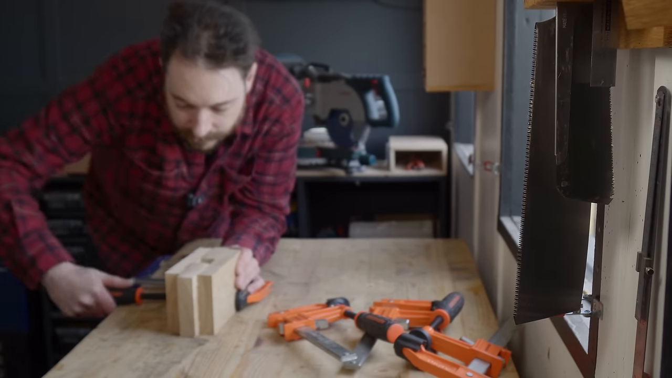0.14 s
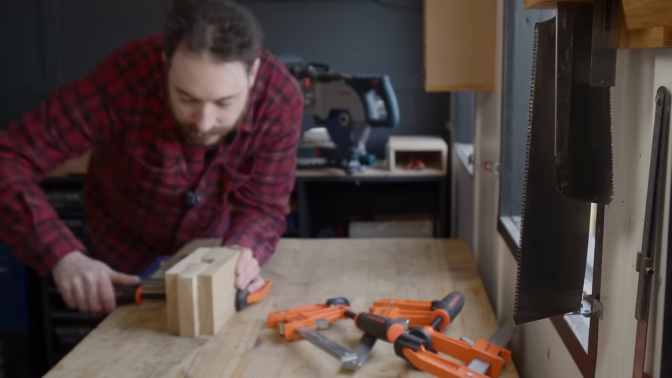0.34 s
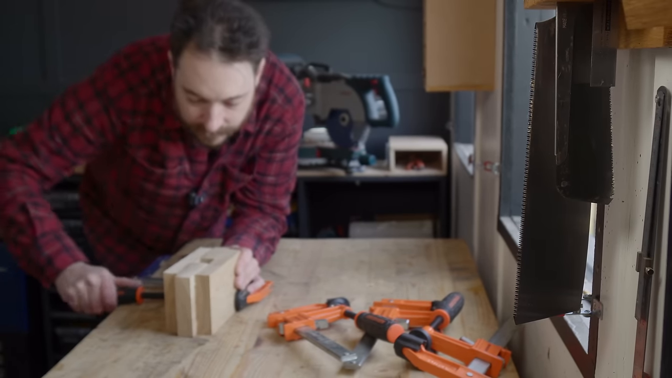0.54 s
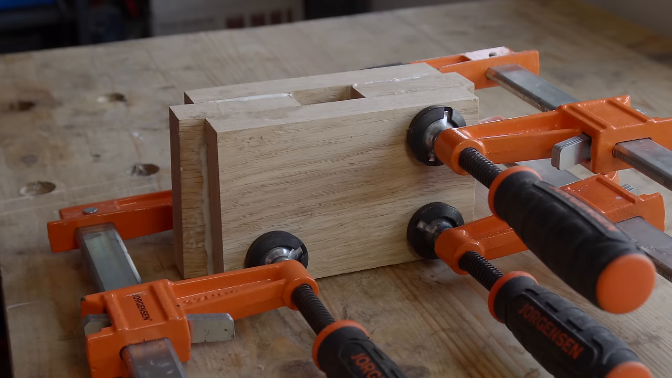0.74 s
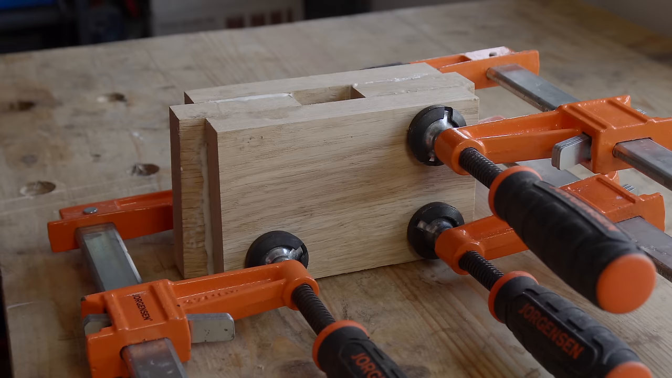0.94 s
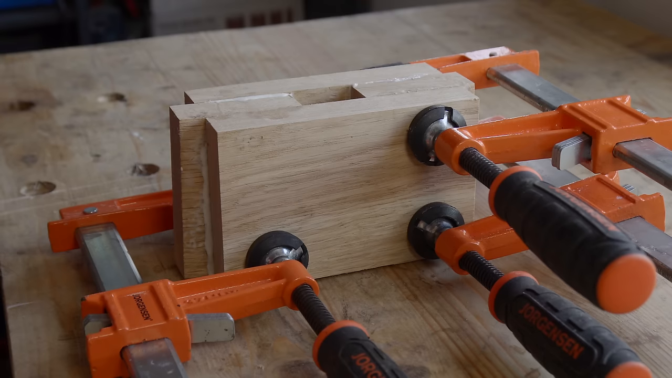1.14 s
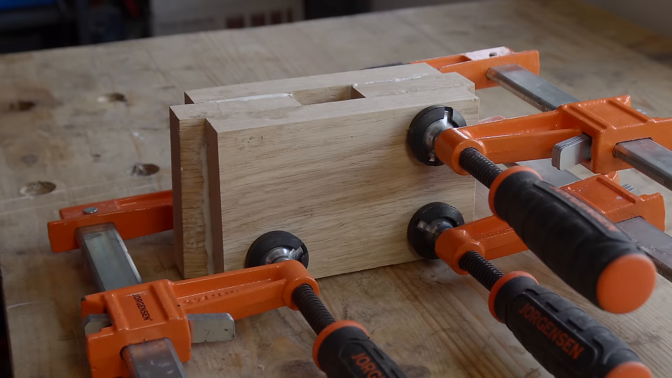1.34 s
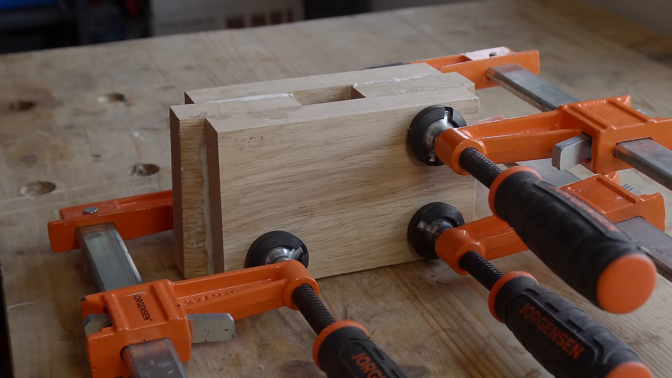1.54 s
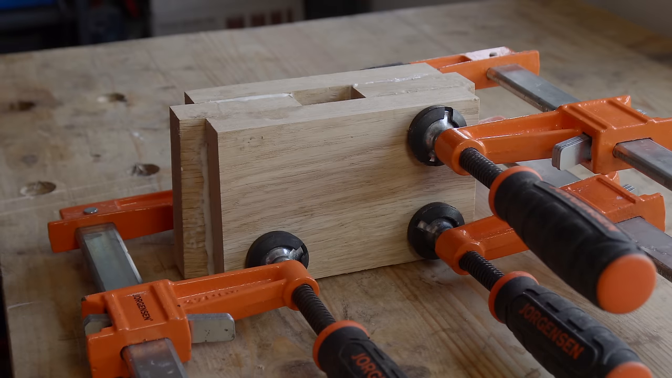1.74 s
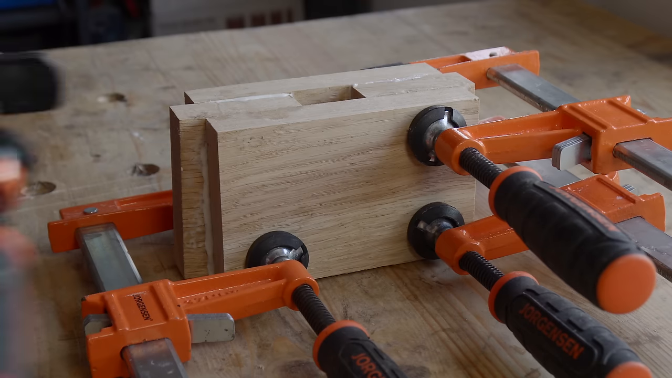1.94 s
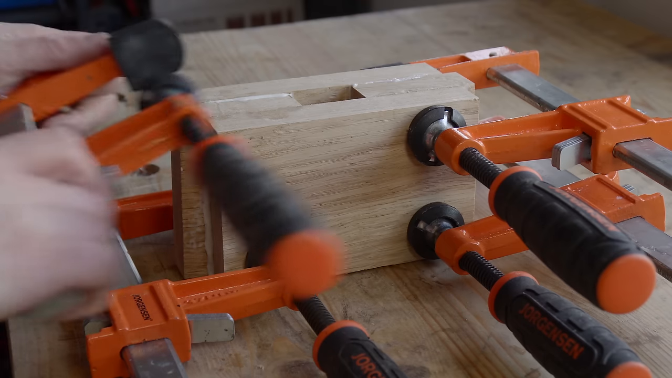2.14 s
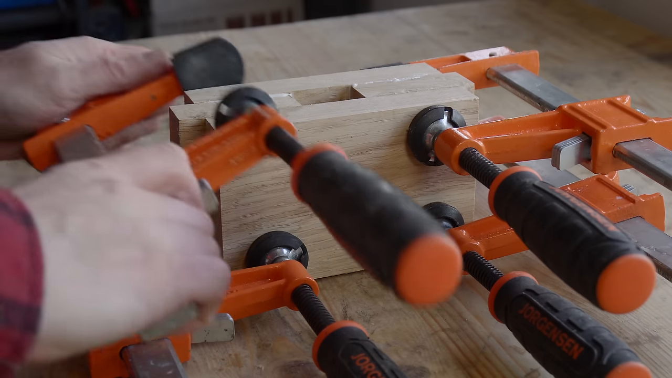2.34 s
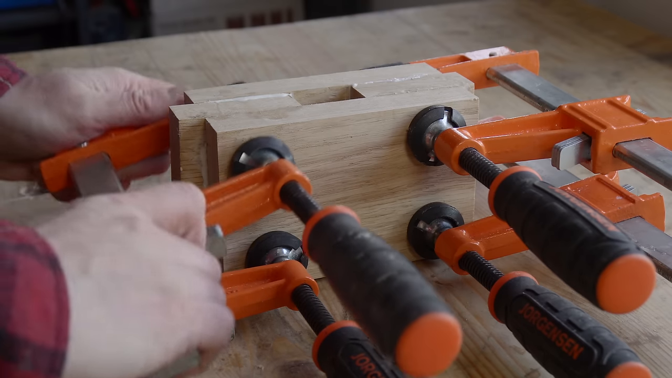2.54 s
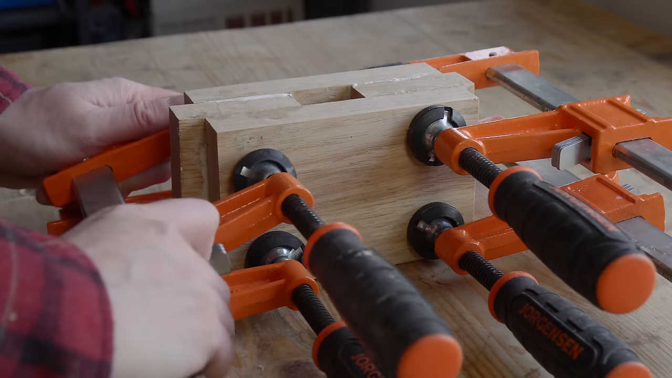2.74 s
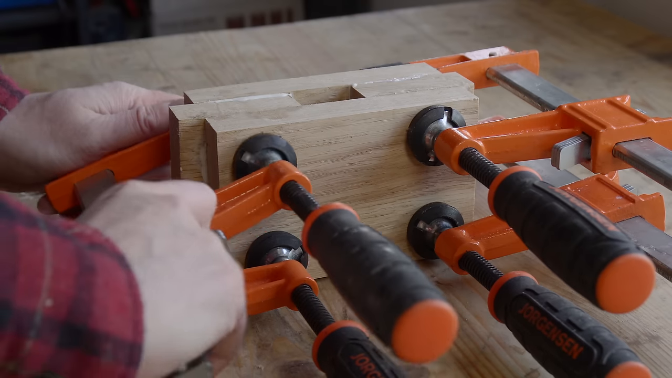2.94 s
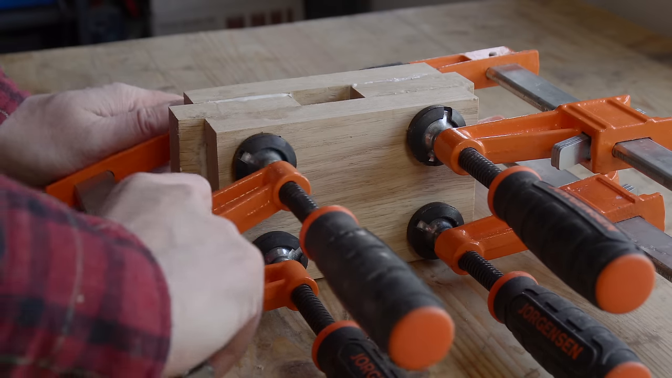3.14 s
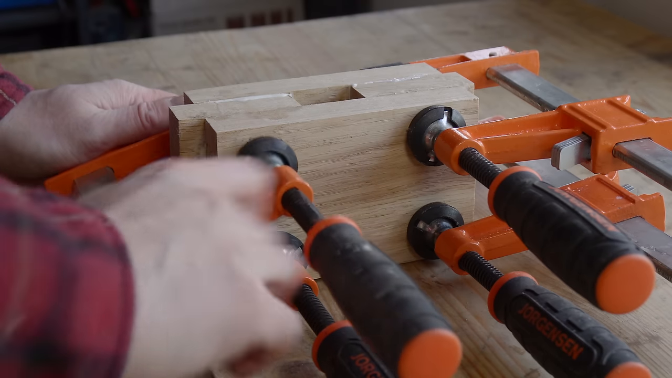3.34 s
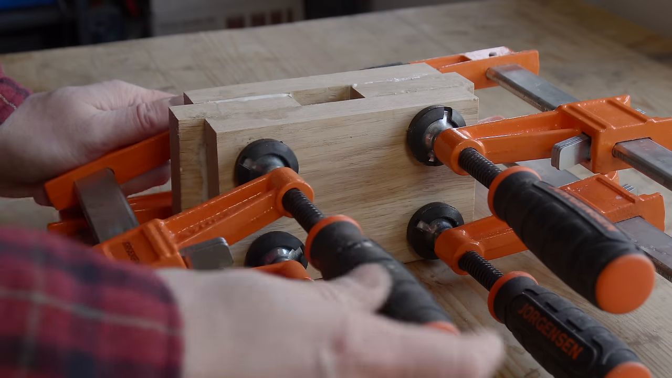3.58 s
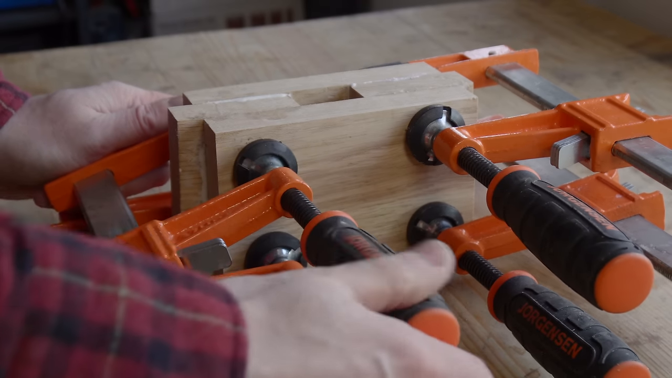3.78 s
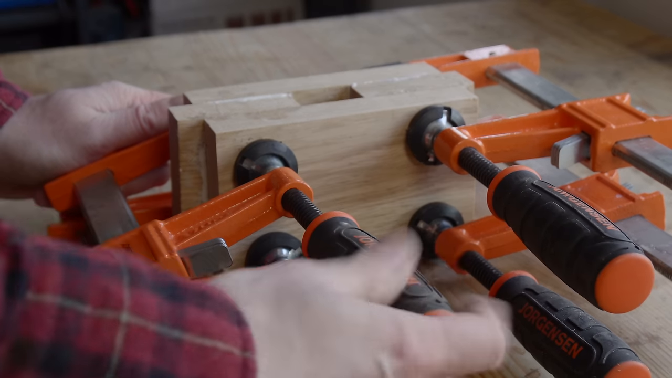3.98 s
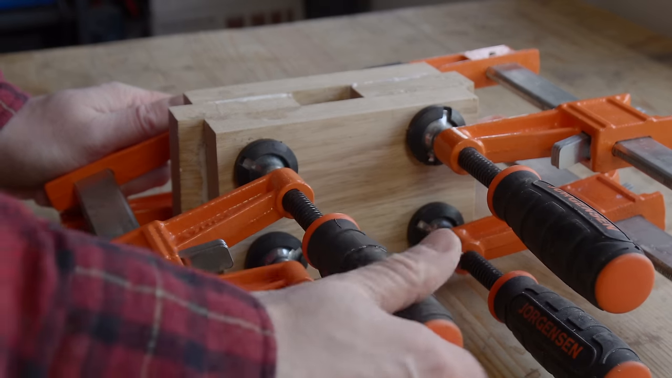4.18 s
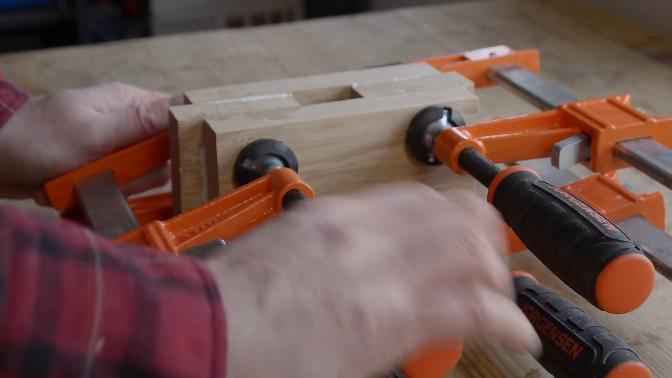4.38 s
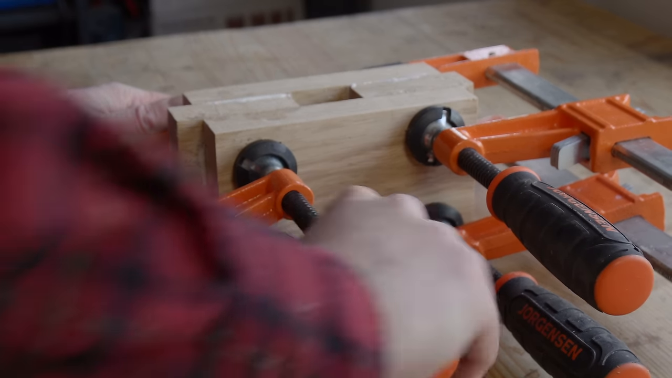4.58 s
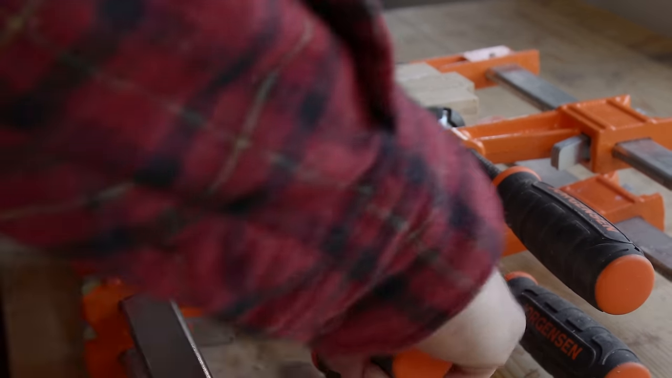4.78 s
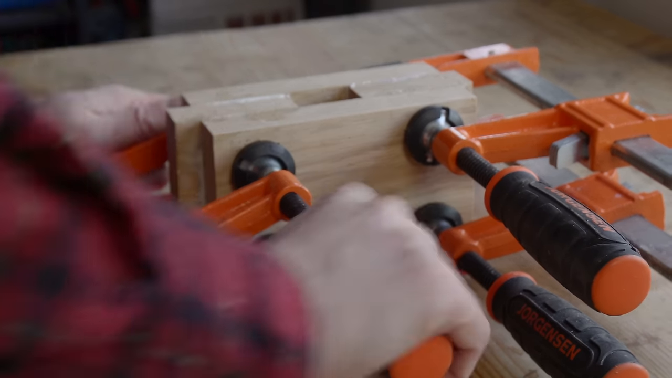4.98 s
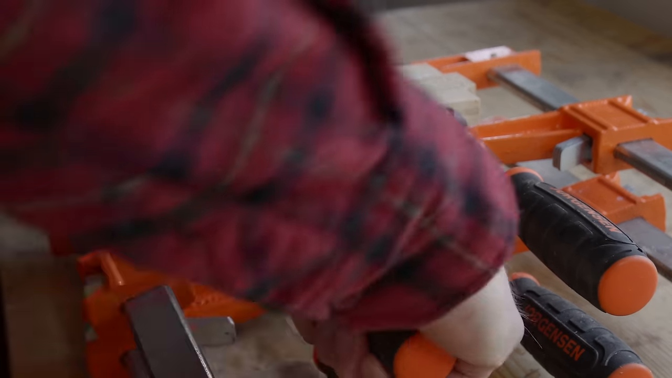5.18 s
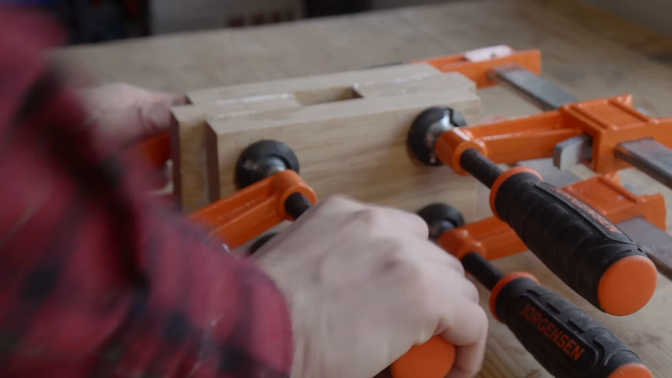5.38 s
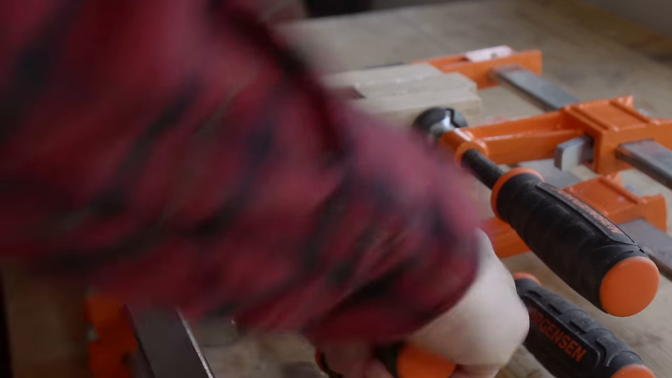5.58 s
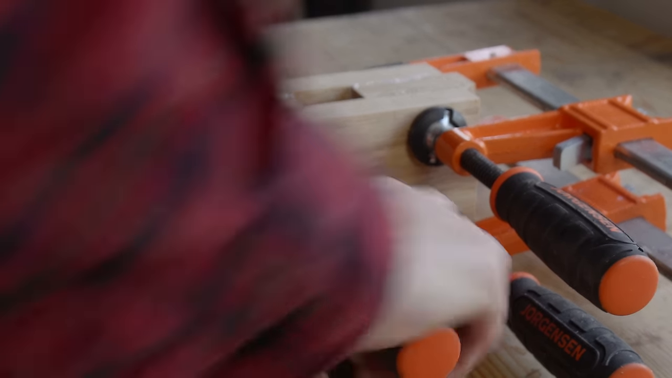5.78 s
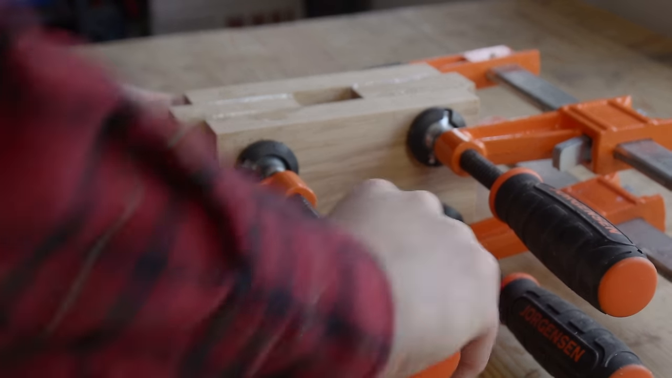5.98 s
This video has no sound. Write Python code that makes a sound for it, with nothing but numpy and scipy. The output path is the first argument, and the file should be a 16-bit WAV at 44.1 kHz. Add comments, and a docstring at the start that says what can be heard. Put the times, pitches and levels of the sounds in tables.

```python
"""A wooden block rubs dully on a workbench, which sways on its legs, under a faint whistling tone.
One microphone above the bench in a small workshop, a shirt sleeve rustling close by. Steel bar clamps
are being fitted: a jaw rasps and chatters along its ringing bar, the clamp knocks down on the wood and
is shut, and its swivel pad slaps the block. The screw ticks, and each of three turns of the handle
bumps the bench and sets it rocking again."""
import sys
import numpy as np
from scipy import signal
from scipy.fft import rfft, irfft
from scipy.io import wavfile

SR = 44100
rng = np.random.default_rng(int(sys.argv[2]) if len(sys.argv) > 2 else 0)


def bounce(signal):
    """Save signal as a 16-bit WAV file at the path given by the first command-line argument."""
    frames = np.transpose(np.atleast_2d(signal))
    limited = np.clip(frames, -1, 1)
    pcm = np.round(limited * 32767).astype(np.int16)
    wavfile.write(sys.argv[1], SR, pcm)


N = 265614
TIME = np.arange(N) / SR


def from_db(db):
    """Decibels to gain."""
    return 10 ** (np.asarray(db) / 20)


def rms_one(x):
    """Scale to rms 1."""
    return x / np.sqrt(np.mean(x ** 2) + 1e-20)


def unit_energy(x):
    """Scale so that the squares sum to 1."""
    return x / np.linalg.norm(x)


def at_hz(points, hz):
    """Read a table on a log-frequency axis."""
    freqs, values = np.transpose(points)
    return np.interp(np.log(np.maximum(hz, 1)), np.log(freqs), values)


def add(track, start_s, sound):
    """Mix a sound into a track."""
    start = round(start_s * SR)
    track[start:start + len(sound)] += sound[:N - start]


def convolve(x, response):
    """Pass a signal through an impulse response."""
    return signal.oaconvolve(x, response)[:N]


def lowpass(x, hz, order=2):
    """Butterworth low-pass."""
    return signal.sosfilt(signal.butter(order, min(hz, .45 * SR), fs=SR, output="sos"), x)


def bandpass(x, edges_hz):
    """Butterworth band-pass."""
    return signal.sosfilt(signal.butter(2, edges_hz, "band", fs=SR, output="sos"), x)


def coloured(x, colour, size=4096):
    """Causal (minimum-phase) filter with the given spectral shape and unit energy."""
    gain = from_db(at_hz(colour, np.fft.rfftfreq(size, 1 / SR)))
    cepstrum = irfft(np.log(gain))
    cepstrum[1:size // 2] *= 2
    cepstrum[size // 2 + 1:] = 0
    response = irfft(np.exp(rfft(cepstrum)))
    return convolve(x, unit_energy(response))


def noise(colour):
    """Coloured noise, rms 1."""
    return rms_one(coloured(rng.standard_normal(N), colour))


def wander(rate_hz):
    """Smooth random drift, rms 1."""
    return rms_one(lowpass(rng.standard_normal(N), rate_hz))


def flutter(rate_hz, depth_db):
    """Uneven contact: a gain that wanders at random, rms 1."""
    return rms_one(from_db(depth_db * np.clip(wander(rate_hz), -2, 2)))


def grains(per_s, spread_db):
    """Tiny random impulses of uneven size, rms 1."""
    sizes = from_db(spread_db * np.minimum(rng.exponential(1, N), 4))
    signs = rng.choice([-1, 1], N)
    present = rng.random(N) < per_s / SR
    return rms_one(sizes * signs * present)


def ringing(modes, size=22050):
    """Impulse response of damped modes, given as rows of pitch_hz, level_db, t60_s."""
    t = TIME[:size]
    return sum(from_db(db - 60 * t / t60) * np.cos(2 * np.pi * hz * t) for hz, db, t60 in modes)


def burst(decay_s, size=2048):
    """Micro-bounces of one contact: roughly even in spectrum, dying quickly, unit energy."""
    t = TIME[:size]
    bounces = rng.standard_normal(size) * np.exp(-t / decay_s)
    whitened = irfft(np.exp(1j * np.angle(rfft(bounces))))
    return unit_energy(whitened * np.exp(-t / (4 * decay_s)))


def swell(peak_s, db, half_s):
    """Bell-shaped rise and fall in level."""
    return from_db(db) * np.exp(-np.minimum(((TIME - peak_s) / half_s) ** 2, 20))


def stroke(peak_s, db, attack_s, hold_s, release_s):
    """Level of one push: it grows tenfold per attack time, holds, and falls tenfold per release time."""
    early = np.maximum(peak_s - TIME, 0) / attack_s
    late = np.maximum(TIME - peak_s - hold_s, 0) / release_s
    return from_db(db - 20 * np.minimum(early + late, 10))


# Tightening turns, timed where the hand grips the handle and bumps the bench: start_s, bump_db
TURNS = [(5.0903, -23), (5.5348, -23), (6.0009, -23.5)]

def each_turn(after_s, db, half_s):
    """One part of the gesture, repeated on every turn: rows of peak_s, level_db, half_length_s."""
    return [(start_s + after_s, db, half_s) for start_s, _ in TURNS]


# Spectrum of the quiet workshop: freq_hz, gain_db
ROOM_TONE_COLOUR = [(25, 11.5), (100, -0.5), (300, -1.5), (800, 0), (1500, -8), (3000, -10.5), (6000, -16),
                    (15000, -22)]

def room_tone(level_db=-72):
    """A faint, steady, low background at the microphone."""
    return from_db(level_db) * noise(ROOM_TONE_COLOUR)


# Hands shift the block on the bench: peak_s, level_db, half_length_s
RUBS = [(0.08, -63, 0.19), (0.523, -56.5, 0.048), (2.586, -70, 0.041), (3.781, -66.5, 0.18),
        (4.386, -68.5, 0.13), (4.95, -65.5, 0.31)]
# Spectrum of wood dragged on wood: freq_hz, gain_db
RUB_COLOUR = [(60, -13), (130, -12), (200, 6.5), (320, 0), (600, -5.5), (1000, -16), (2000, -20.5),
              (5000, -36)]

def block_rub():
    """The block drags over the bench in sparse, dull slips when shifted and on each turn."""
    moves = RUBS + each_turn(after_s=0.19, db=-61.5, half_s=0.22)
    level = sum(swell(*move) for move in moves)
    return level * coloured(grains(per_s=410, spread_db=-1.5), RUB_COLOUR)


# Shoves that set the bench swaying: start_s, level_db
SHOVES = [(0.1, -72.5), (0.626, -60), (1.029, -78), (2.625, -56), (3.005, -47.5), (3.411, -55),
          (4.1, -52.5), (4.6, -47)]
# Spectrum of the bench's rumble: freq_hz, gain_db
RUMBLE_COLOUR = [(12, -10), (25, 0), (50, -2.5), (90, -10.5), (160, -29.5), (500, -66)]

def bench_sway(leg_hz=26.6, wander_hz=3, rumble_db=-5, turn_db=-47, lag_s=0.085):
    """After each shove or turn the bench rocks at the wavering rate of its legs, rumbles and settles."""
    shoves = SHOVES + [(s, turn_db) for s, _ in TURNS]
    level = sum(stroke(s + lag_s, db, attack_s=0.11, hold_s=0.026, release_s=0.38) for s, db in shoves)
    rate_hz = leg_hz + wander_hz * wander(rate_hz=10)
    rocking = rms_one(np.sin(2 * np.pi * np.cumsum(rate_hz) / SR))
    return level * (rocking + from_db(rumble_db) * noise(RUMBLE_COLOUR))


# Two faint, drawn-out whistling tones, then two short creaks: peak_s, level_db, half_length_s, pitch_hz
WHISTLES_AND_CREAKS = [(0.23, -76, 0.16, 1500), (3.776, -72, 0.2, 1780), (4.387, -63.5, 0.026, 1150),
                       (5.68, -56, 0.043, 620)]

def whistles_and_creaks(twist_hz=1174, log_half_width=0.14):
    """Narrow bands of noise whistle or creak; on each turn the pad creaks as it twists on the wood."""
    twists = [(*twist, twist_hz) for twist in each_turn(after_s=0.229, db=-62, half_s=0.031)]
    hiss = grains(per_s=4100, spread_db=0.5)
    tones = np.zeros(N)
    for peak_s, db, half_s, pitch_hz in WHISTLES_AND_CREAKS + twists:
        resonance = bandpass(hiss, pitch_hz * np.exp([-log_half_width, log_half_width]))
        tones += swell(peak_s, db, half_s) * rms_one(resonance)
    return tones


# Blows that reach the block and bench: start_s, level_db, hardness_hz
KNOCKS = [(0.471, -55.5, 2960), (0.626, -48, 2920), (2.524, -47.5, 1400), (2.625, -39, 291),
          (2.8511, -48.5, 1484), (2.927, -40.5, 792), (2.976, -32.5, 1210), (3.005, -25.5, 920),
          (3.064, -35, 850), (3.412, -31, 1800), (4.069, -41.5, 297), (4.356, -39, 700), (4.374, -40, 1277),
          (4.521, -44, 447)]
# Modes of the block and bench top: pitch_hz, level_db, t60_s
BENCH_MODES = [(176, -6, .28), (200, -5, .24), (275, -4, .19), (324, -8, .17), (376, -2, .12),
               (484, -11, .13), (535, -7, .15), (665, -7, .1), (900, -8, .08)]
# Spectrum of the wood's thud: freq_hz, gain_db
THUD_COLOUR = [(60, -16), (150, -9.5), (300, 6.5), (600, -5.5), (1200, -2.5), (3000, -12.5), (9000, -31)]

def bench_knocks(thud_db=14, ring_db=-11, vary_db=3, turn_hardness_hz=615):
    """Each blow thuds and rings the bench in its own mix; soft contacts reach only the low modes."""
    push, ring = np.zeros(N), np.zeros(N)
    impulse = signal.unit_impulse(SR // 20)
    bumps = [(*turn, turn_hardness_hz) for turn in TURNS]
    for start_s, db, hardness_hz in KNOCKS + bumps:
        modes = [(hz, level + vary_db * rng.standard_normal(), t60) for hz, level, t60 in BENCH_MODES]
        add(push, start_s, from_db(db) * lowpass(impulse, hardness_hz, order=4))
        add(ring, start_s, from_db(db) * lowpass(ringing(modes), hardness_hz, order=4))
    return from_db(thud_db) * coloured(push, THUD_COLOUR) + from_db(ring_db) * ring


# The arm moves between jobs, close to the microphone: peak_s, level_db, half_length_s
SWISHES = [(0.778, -70, 0.082), (2.207, -76, 0.091), (3.351, -73, 0.054), (3.75, -71.5, 0.11),
           (4.1, -71, 0.082), (4.272, -69, 0.05), (4.376, -61, 0.028), (4.59, -63.5, 0.099)]
# Spectrum of shirt cloth: freq_hz, gain_db
SLEEVE_COLOUR = [(500, -7.5), (1300, -1.5), (2200, -5), (3000, 3), (4200, -4), (7000, -1.5), (10000, -7.5),
                 (15000, -10)]

def sleeve_rustle():
    """Cloth fibres hiss unevenly as the arm moves, swings back for a turn and grips the handle."""
    reaches = each_turn(after_s=-0.17, db=-62.5, half_s=0.04)
    grips = each_turn(after_s=-0.013, db=-60, half_s=0.034)
    level = sum(swell(*move) for move in SWISHES + reaches + grips)
    fibres = coloured(grains(per_s=6300, spread_db=1.0), SLEEVE_COLOUR)
    return level * fibres * flutter(rate_hz=55, depth_db=2.4)


# Single steel-on-steel contacts: start_s, level_db, brightness_hz
CLINKS = [(0.995, -40, 6830), (1.029, -21.5, 12100), (1.0318, -12, 15500), (1.292, -17.5, 8100),
          (1.5, -37, 4320), (1.672, -45, 3900), (1.704, -42.5, 7640), (1.7486, -36.5, 13600),
          (1.798, -26.5, 4400), (1.8333, -26.5, 4660), (1.836, -34.5, 4900), (2.627, -47, 6700),
          (2.8513, -25.5, 8330), (2.854, -32, 8740), (2.917, -36, 4250), (2.937, -39, 6000),
          (2.9526, -23, 13000), (2.9965, -26, 14500), (3.0056, -18.5, 16450), (3.0069, -16, 14300)]
# Modes of the clamp's bar and jaw: pitch_hz, level_db, t60_s
BAR_MODES = [(1720, -11, .12), (2169, -7, .26), (2406, -9, .14), (2467, -10, .18), (3402, -8, .11),
             (4274, -5, .21), (4404, -7, .18), (4618, -4, .19), (6053, -6, .19), (7009, -6, .13),
             (7594, -6, .21), (7682, -6, .21), (7951, -7, .24), (8630, -12, .16), (9453, -3, .2),
             (11397, 5.5, .14), (11487, 6.5, .13), (12586, -4, .16)]
# Spectrum of the crack of steel on steel: freq_hz, gain_db
CRACK_COLOUR = [(150, -31), (600, -20), (1200, -9.5), (1700, -4.5), (2400, -0.5), (3300, -4), (4500, 2),
                (7000, 0.5), (10000, -1), (11700, 7), (13200, -5.5), (16000, -15)]

def steel_clinks(crack_db=15, ring_db=-30, vary_db=2.5, single_chatter_s=0.0033):
    """Each contact or catch of the jaw cracks, then the bar rings in a mix set by where it is touched."""
    force, ring = np.zeros(N), np.zeros(N)
    modes = np.array([ringing([mode], size=12000) for mode in BAR_MODES])
    singles = [(*clink, single_chatter_s) for clink in CLINKS]
    for start_s, db, brightness_hz, chatter_s in singles + jaw_catches():
        contact = from_db(db) * lowpass(burst(chatter_s), brightness_hz)
        mix = from_db(vary_db * rng.standard_normal(len(modes)))
        add(force, start_s, contact)
        add(ring, start_s, signal.fftconvolve(contact, mix @ modes))
    return from_db(crack_db) * coloured(force, CRACK_COLOUR) + from_db(ring_db) * ring


# Pushes that slide the jaw: peak_s, level_db, attack_s, hold_s, release_s, top_speed_fraction
SLIDES = [(1.029, -36.5, 0.001, 0.012, 0.091, 1), (1.29, -32, 0.14, 0.028, 0.068, 1),
          (1.501, -49.5, 0.0085, 0.06, 0.06, 0.01), (1.696, -57, 0.019, 0.0073, 0.05, 0.05)]
# Bar modes that sing under the sliding jaw: pitch_hz, width_hz, level_db
SQUEAL_MODES = [(12100, 500, -8), (7600, 50, 0), (7700, 80, 0), (7800, 70, -3), (7952, 45, -1),
                (9455, 40, -5)]
# Spectrum of the jaw's rasp: freq_hz, gain_db
RASP_COLOUR = [(100, -34.5), (400, -13), (900, -2.5), (1700, -5.5), (2400, 1), (5000, 0), (7000, -1.5),
               (10500, -8.5), (12200, -2.5), (13500, -14.5), (16000, -24)]

def jaw_slide(speed_up_s=0.047, slow_cutoff_hz=3800, squeal_db=-2, bar_db=-14):
    """The jaw rasps over the bar and rings it; speed brightens the rasp and makes the bar sing."""
    fast, slow = np.zeros(N), np.zeros(N)
    for peak_s, db, attack_s, hold_s, release_s, top_speed in SLIDES:
        force = stroke(peak_s, db, attack_s, hold_s, release_s)
        speed = top_speed * np.clip(1 + (TIME - peak_s) / speed_up_s, 0, 1)
        fast += force * speed
        slow += force * (1 - speed)
    friction = grains(per_s=9000, spread_db=3.0) * flutter(rate_hz=130, depth_db=1.8)
    drag = fast * friction + lowpass(slow * friction, slow_cutoff_hz, order=1)
    # The narrower a mode, the longer it rings.
    singing = [(hz, db + 10 * np.log10(width_hz), np.log(1000) / (np.pi * width_hz))
               for hz, width_hz, db in SQUEAL_MODES]
    squeal = convolve(fast * friction, unit_energy(ringing(singing)))
    ring = convolve(drag, unit_energy(lowpass(ringing(BAR_MODES), hz=5454)))
    return coloured(drag, RASP_COLOUR) + from_db(bar_db) * ring + from_db(squeal_db) * squeal


# Runs of the juddering jaw: start_s, end_s, gap_s, first_level_db, first_brightness_hz, chatter_s
JUDDERS = [(1.0448, 1.1247, 0.0115, -18.5, 8770, 0.002), (1.165, 1.2, 0.019, -24, 4650, 0.003),
           (2.548, 2.595, 0.023, -46, 3860, 0.0017), (2.971, 2.9916, 0.0112, -18, 13600, 0.0041)]

def jaw_catches(fade_db_per_s=22, dull_octaves_per_s=14, vary_db=5.5, jitter_s=0.0004):
    """Contacts of a jaw that judders along the bar: almost evenly spaced, tending weaker and duller."""
    catches = []
    for start_s, end_s, gap_s, first_db, first_hz, chatter_s in JUDDERS:
        length_s = end_s - start_s
        for age_s in np.linspace(0, length_s, round(length_s / gap_s) + 1):
            catch_s = start_s + age_s + jitter_s * rng.standard_normal()
            db = first_db - fade_db_per_s * age_s + vary_db * rng.standard_normal()
            brightness_hz = first_hz * 2 ** (-dull_octaves_per_s * age_s)
            catches.append((catch_s, db, brightness_hz, chatter_s))
    return catches


# Two contacts of the swivel pad on the block, heard as one slap: start_s, level_db
PAD_CONTACTS = [(3.4106, -19.5), (3.412, -25)]
# Modes of the pad: pitch_hz, level_db, t60_s
PAD_MODES = [(530, 3, .15), (1598, -5, .06), (1896, -6, .05), (2025, -8, .13), (2060, 3, .045),
             (2458, -10, .09), (2690, -8, .07)]
# Spectrum of the slap: freq_hz, gain_db
PAD_COLOUR = [(200, 3.5), (550, 4), (1150, -20), (1650, 2), (2030, 15), (2300, -2), (2750, 9), (3400, -19),
              (6500, -11.5), (9000, -27), (13000, -68)]

def pad_slap(slap_db=11, ring_db=-17):
    """The loose pad slaps the wood once and rings briefly."""
    force = np.zeros(N)
    for start_s, db in PAD_CONTACTS:
        add(force, start_s, from_db(db) * burst(decay_s=0.002))
    ring = convolve(lowpass(force, hz=4160), ringing(PAD_MODES))
    return from_db(slap_db) * coloured(force, PAD_COLOUR) + from_db(ring_db) * ring


# Slips of the screw and handle: start_s, level_db
TICKS = [(4.184, -34.5), (4.7745, -20.5), (5.6486, -27)]
# Spectrum of a tick: freq_hz, gain_db
TICK_COLOUR = [(200, -35), (900, 8), (2000, 6), (3000, 2.5), (3700, 13), (4400, 5.5), (5000, 1.5),
               (8000, -2), (16000, -30)]

def screw_ticks():
    """The screw slips in tiny dry ticks."""
    force = np.zeros(N)
    for start_s, db in TICKS:
        add(force, start_s, from_db(db) * burst(decay_s=0.002))
    return coloured(force, TICK_COLOUR)


# Decay of the small workshop: freq_hz, t60_s
ROOM_T60 = [(150, 0.3), (400, 0.19), (1000, 0.22), (3000, 0.2), (7500, 0.2), (14000, 0.14)]

def workshop_reflections(x, first_echo_s=0.0012, size=22050):
    """Dense reflections reach the microphone and die at their own rate in each octave."""
    t, response = TIME[:size], np.zeros(size)
    edges_hz = np.geomspace(70, 18000, 9)
    for low, high in zip(edges_hz, edges_hz[1:]):
        t60_s = at_hz(ROOM_T60, np.sqrt(low * high))
        response += bandpass(rng.standard_normal(size), [low, high]) * from_db(-60 * t / t60_s)
    response *= np.clip(t / first_echo_s - 1, 0, 1)
    return convolve(x, unit_energy(response))


def scene(steel_room_db=-6, wood_room_db=-5, screw_room_db=-12):
    """One microphone above the bench; screw and pad are nearer, so drier, than the bar and the wood."""
    steel = steel_clinks() + jaw_slide()
    wood = bench_knocks()
    screw = screw_ticks() + pad_slap()
    to_room = from_db(steel_room_db) * steel + from_db(wood_room_db) * wood
    to_room += from_db(screw_room_db) * screw
    room = workshop_reflections(to_room) + room_tone()
    soft_sounds = sleeve_rustle() + block_rub() + whistles_and_creaks() + bench_sway()
    return (steel + wood + screw + soft_sounds + room)[None]


def record(dry, cutoff_hz=16200):
    """The highest treble is cut steeply."""
    return signal.sosfilt(signal.ellip(10, .1, 80, cutoff_hz, fs=SR, output="sos"), dry)


dry = scene()
out = record(dry)
bounce(out)
```